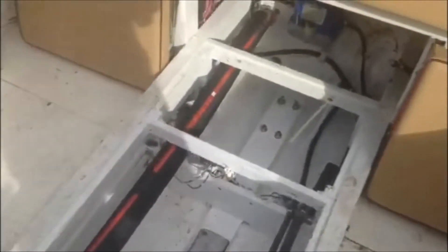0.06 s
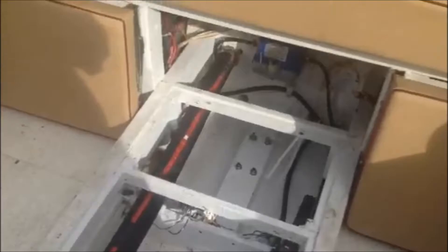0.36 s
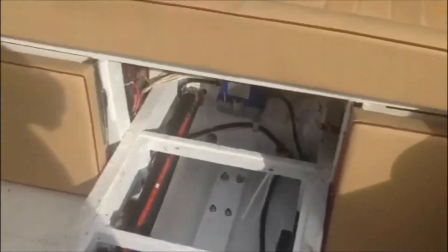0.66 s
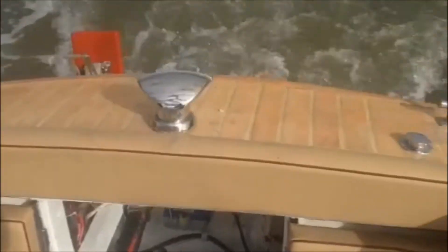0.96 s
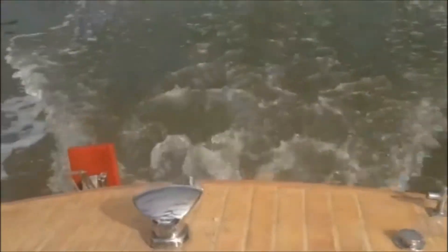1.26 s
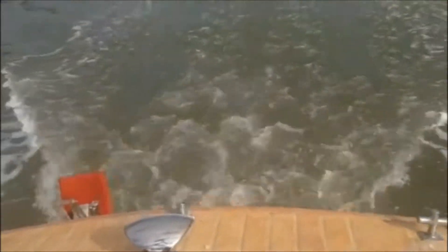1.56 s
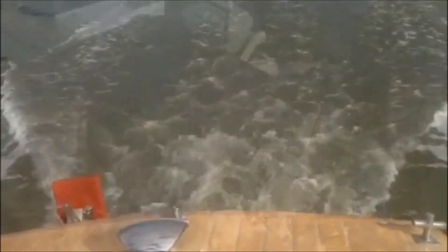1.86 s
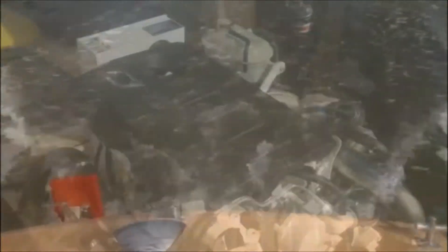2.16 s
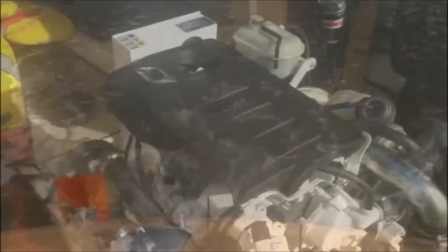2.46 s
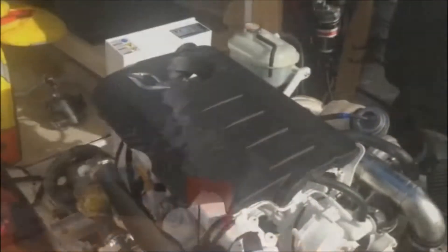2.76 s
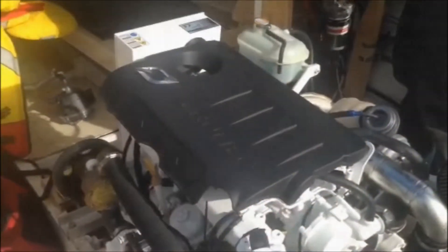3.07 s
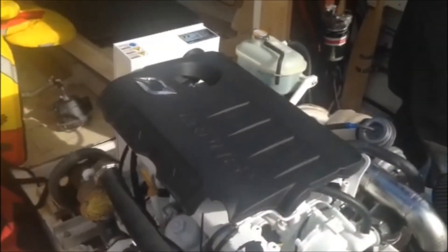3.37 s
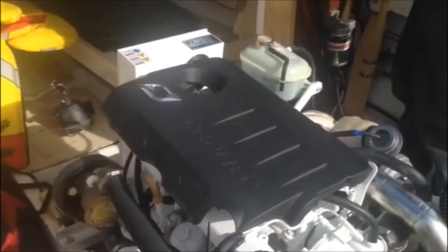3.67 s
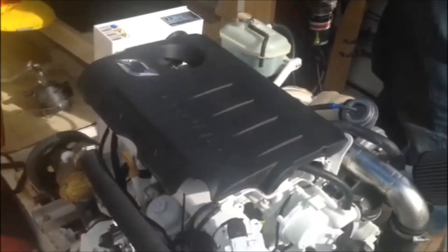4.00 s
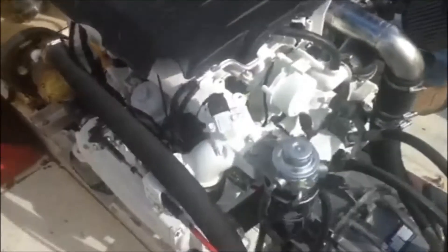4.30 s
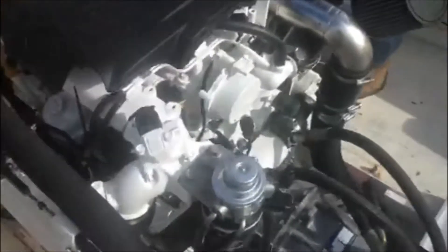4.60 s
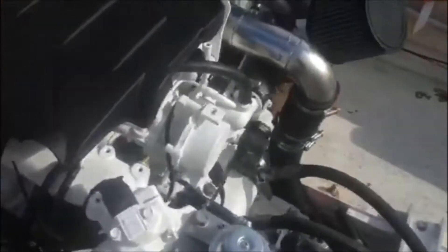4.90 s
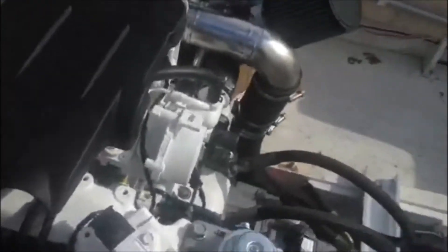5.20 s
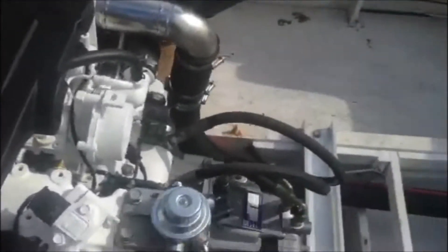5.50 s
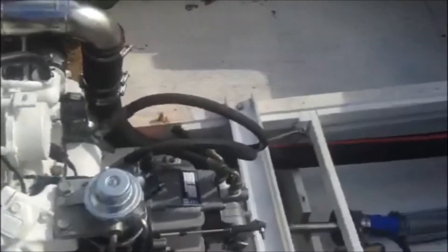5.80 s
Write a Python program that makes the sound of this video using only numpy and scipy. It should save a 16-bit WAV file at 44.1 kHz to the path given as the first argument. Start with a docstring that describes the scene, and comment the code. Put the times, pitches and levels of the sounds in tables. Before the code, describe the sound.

Heard from the back of a boat, a diesel engine thumps and clatters at a loping idle. Suddenly the microphone is right over the engine, louder, as it accelerates: the block knocks, the exhaust booms briefly, and the turbo's airy rush rises until only a bright hiss is left. Water rumbles against the hull underneath. At cruising speed the engine holds a clattering hum, topped by a fluttering whine.

```python
"""Four-cylinder boat diesel. At idle, from the stern: one cylinder thumps, injectors clatter, a gear sings.
Then, abruptly, from above the open engine bay, pulling up to cruise: combustion knocks in the block,
valves clatter, the wet exhaust booms, the turbo's rush climbs out of hearing, churned water rumbles.
Firing and propeller settle into a hum under a rough whine. Engine speed, effort and turbo speed drive
the layers; resonances swell as the rising pitches pass through them."""
import sys
import numpy as np
from scipy import signal
from scipy.fft import rfft, irfft, next_fast_len
from scipy.io import wavfile
from scipy.ndimage import uniform_filter1d, map_coordinates

SR = 44100
rng = np.random.default_rng(int(sys.argv[2]) if len(sys.argv) > 2 else 0)


def store_wav(level_fs):
    """Save 16-bit WAV to argv[1]."""
    pcm = np.round(np.clip(np.atleast_2d(level_fs), -1, 1) * 32767)
    wavfile.write(sys.argv[1], SR, pcm.T.astype(np.int16))


N = 266805
TIME_S = np.arange(N) / SR

# hull modes struck at idle (frequency [Hz], time constant [s], strength for cylinder 1, 2, 3, 4 [dB])
HULL_MODES = [(87.7, 0.01, -30, -28, -33, -29), (167, 0.0043, -24, -30, -45, -40),
              (218, 0.0029, -24, -33, -22, -21), (325, 0.0047, -29, -29, -22, -47)]
# engine speed under load (time [s], firing rate [Hz])
FIRING_HZ = [(1.75, 40), (2.08, 45.8), (2.55, 51), (2.9, 58.8), (3.7, 71.2), (3.97, 78.3), (4.22, 87.3),
             (4.48, 91.5), (4.8, 92.6), (5.1, 95), (6.05, 98.5)]
# engine effort (time [s], level [dB])
EFFORT_DB = [(1.75, -21.5), (2.08, -17.3), (2.2, -18.5), (2.58, -16), (2.68, -17), (2.94, -14.5),
             (3.1, -17), (3.33, -14.8), (3.72, -18.5), (4.08, -21), (4.5, -18.5), (5.2, -19.3),
             (5.42, -17.3), (5.56, -19), (6.05, -18)]
# turbo spool-up (time [s], rush centre [Hz])
TURBO_HZ = [(1.75, 3970), (2.2, 5050), (2.6, 5600), (2.9, 8370), (3.72, 13180), (4.1, 15050), (4.4, 18800)]
# churned water (time [s], level [dB])
WATER_DB = [(1.75, -31), (1.95, -22.5), (2.1, -32.5), (2.6, -21), (3.15, -26), (3.3, -45), (3.75, -46),
            (3.9, -34), (4.47, -21), (4.85, -30), (5.4, -26.5), (6.05, -30)]
# shaft lines at cruise (order [x firing rate], relative level [dB])
SHAFT_ORDERS = [(2, -15), (2.5, -13), (2.75, -11), (3.25, -15), (3.75, -22), (4, -23), (6, -26), (7, -26),
                (11, -23), (23.5, -20)]
# whine spells (start [s], length [s], first pitch [Hz], target pitch [Hz], level [dB])
WHINE_SPELLS = [(4.19, .18, 2980, 3150, -29), (4.77, 1.0, 3165, 3276, -26), (5.87, .3, 3180, 3175, -25.5)]

# spectra (frequency [Hz], relative density [dB]); TOP: above the cover, FRONT: by the belt drive
IDLE_SPECTRUM = [(20, -22), (45, -4), (75, 0), (250, 3.5), (370, 5), (480, -2), (650, -0.5), (1400, -1),
                 (2100, -6), (2900, -6.5), (4600, -7), (6800, -11), (9000, -17), (15000, -25.5)]
BLOCK_TOP_SPECTRUM = [(270, -9), (450, -6), (520, -5.5), (620, -0.5), (700, -3.5), (790, -3), (880, -5),
                      (1200, -2), (1420, -2), (1750, -2), (2100, -7.5), (2260, -2), (2650, -8), (3100, -23),
                      (4500, -70)]
BLOCK_FRONT_SPECTRUM = [(270, -48), (450, -3), (570, 1.1), (690, 0), (760, -1.5), (900, -2.5), (1050, -2),
                        (1250, -1), (1630, -4.5), (1850, 2), (2050, -3.5), (2300, 0), (2700, -0.8),
                        (3100, -14), (4500, -70)]
VALVE_TOP_SPECTRUM = [(1800, -52), (2700, -7.5), (3200, -4), (3800, 1.5), (4600, 0), (5600, -0.5),
                      (6200, -21), (8000, -18)]
VALVE_FRONT_SPECTRUM = [(1800, -24), (2700, -7), (3100, -2.5), (3700, 0), (4600, -1.5), (5600, -1.5),
                        (6200, -5.5), (8000, -22)]
BOOM_LOW_REV_SPECTRUM = [(100, -49), (165, -8.5), (215, -8), (270, -1.5), (322, 4.5), (370, -8.5),
                         (430, -4), (480, -16), (600, -9), (1000, -72)]
BOOM_HIGH_REV_SPECTRUM = [(100, -54), (170, -9), (220, -1.5), (260, -4), (315, 2.5), (370, -7.5),
                          (440, -10.5), (540, -35), (1000, -70)]
HISS_TOP_SPECTRUM = [(3650, -31), (6200, -4.5), (6890, -3), (7430, -4), (8710, -2.5), (9540, -5.5),
                     (10200, -2.5), (11300, -2.5), (13400, 0), (15300, -3.5)]
HISS_FRONT_SPECTRUM = [(3650, -41), (6200, -5), (6970, 1), (8140, -1), (9260, -5.5), (10900, -3.5),
                       (11700, 2.5), (12300, -2.5), (14700, 1.5), (15300, -2.5)]
WATER_SPECTRUM = [(15, -27), (35, -24), (60, -4.5), (110, -4), (160, 1), (200, -3.5), (260, -6.5),
                  (500, -75)]
DECK_SPECTRUM = [(10, -12), (30, -10), (55, 6), (90, -20), (200, -60)]
# turbo rush sidebands (offset from centre [Hz], relative density [dB])
RUSH_NARROW = [(1, -11), (200, 7), (550, -5), (1500, -33), (4000, -70)]
RUSH_WIDE = [(1, 0), (600, -8), (1300, -11), (2500, -11), (5000, -70)]

# ringing panels at idle, castings and pipes in the bay (centre [Hz], width [Hz], lift [dB])
PANEL_PEAKS = [(802, 76, 8), (840, 30, -7.5), (1460, 52, 4), (1880, 68, 3), (2257, 79, 6.5), (2430, 110, 9),
               (3140, 70, 3.5), (3735, 210, 7), (5450, 220, 2.5)]
BAY_PEAKS = [(795, 34, 5.5), (1196, 28, 4.5), (1405, 83, 5.5), (2267, 25, 6.5), (2794, 68, 6.5),
             (2992, 97, 7), (3160, 81, 9), (3360, 41, 7), (3725, 51, 5.5), (3940, 51, 3.5), (4300, 86, 6),
             (4670, 120, 7.5), (5090, 51, 7), (5740, 135, 6.5), (6830, 250, 3), (7990, 320, 3),
             (10060, 200, 3.5), (13450, 250, 1)]
# resonances crossed by rising pitches (centre [Hz], width [Hz], peak gain [dB])
FIRING_PEAKS = [(88.06, 5.4, -18), (98, 6.6, -20.5)]
PROPELLER_PEAKS = [(151.7, 16.3, -25)]
INTAKE_PEAKS = [(4770, 500, -18.5), (5620, 120, -14), (10000, 3500, -38), (13300, 2100, -15)]
DRONE_PEAKS = [(417, 14, -34), (458, 20, -39)]
# exhaust pipe ringing (firing rate [Hz], width [Hz], level re boom [dB])
PIPE_PEAKS = [(45.7, 1.2, 0), (51, 2, -7)]

IDLE_FIRING_HZ, FIRST_FIRING_S = 30.44, .025
BLADES_PER_FIRING, TEETH_PER_FIRING = 1.594, 42
BAY_START_S, APPROACH_START_S = 1.744, 4.1
FULL_BOOST_HZ, BAND_LIMIT_HZ = 13770, 15330


def cylinder_thumps(lope_db=-15.5, lope_lead_s=.0057):
    """Idle firings strike the hull modes; the fourth cylinder hits hardest, so the idle lopes."""
    t, out = TIME_S[:SR // 8], np.zeros(N + SR)
    mode = lambda hz, tau_s: (t / tau_s) ** 2 * np.exp(-t / tau_s) * np.sin(2 * np.pi * hz * t)
    firing_s = FIRST_FIRING_S + np.arange(round(2 * IDLE_FIRING_HZ)) / IDLE_FIRING_HZ
    for hz, tau_s, *cylinder_db in HULL_MODES:
        for k, (jitter, force) in enumerate(rng.standard_normal((len(firing_s), 2))):
            at = max(round((firing_s[k] - .007 + .00082 * jitter) * SR), 0)
            out[at:at + len(t)] += amp(cylinder_db[k % 4] + 3.3 * force) * mode(hz, tau_s)
    for strong_s in firing_s[3::4]:
        detune, force = rng.standard_normal(2)
        thump = mode(172 + 5 * detune, .0062) + amp(-7.5 + 3 * force) * mode(218, .0048)
        at = round((strong_s - lope_lead_s) * SR)
        out[at:at + len(t)] += amp(lope_db) * thump
    return out[:N]


def idle_clatter(firings, crossover_hz=2400, fade_db_per_s=3):
    """Knock below, injector ticks above ring the panels; fades as the listener leans over the stern."""
    knock = rattle(firings, repeat=.48, pulse_db=2.7, scatter_db=1.5)
    ticks = rattle(firings, repeat=.35, pulse_db=1.5, scatter_db=1.1)
    low_share = lambda hz: 1 / (1 + (hz / crossover_hz) ** 4)
    lows = filtered(knock, lambda hz: np.sqrt(low_share(hz)))
    highs = filtered(ticks, lambda hz: np.sqrt(1 - low_share(hz)))
    return amp(-23 - fade_db_per_s * TIME_S) * coloured(lows + highs, IDLE_SPECTRUM, PANEL_PEAKS)


def hull_hum(firings):
    """Firing pulses, shaft orders and propeller blades drive the hull at its resonances."""
    firing_hz = curve(FIRING_HZ)
    tone = lambda order, drift_rad: sine(order * firings, drift_rad * wobble(6.2))
    shaft = sum(amp(db + 1.564 * wobble(6.1)) * tone(order, .4) for order, db in SHAFT_ORDERS)
    cruise = ramp(TIME_S, 4.3, 5.34)
    engine = tone(.99, .061) * amp(.9 * wobble(13)) + amp(2) * cruise * shaft
    blades = tone(BLADES_PER_FIRING, .12) + amp(-26) * cruise * tone(2 * BLADES_PER_FIRING, .29)
    blade_gain = swept(BLADES_PER_FIRING * firing_hz, PROPELLER_PEAKS) * amp(wobble(6))
    return swept(firing_hz, FIRING_PEAKS) * engine + blade_gain * blades


def block_knock(firings, boost_cut_db=6, approach_db_per_s=2.5):
    """Combustion knocks in the block; boost softens it."""
    top, front = (coloured(rattle(firings, repeat=.33, pulse_db=.5, scatter_db=1.96), shape, BAY_PEAKS)
                  for shape in (BLOCK_TOP_SPECTRUM, BLOCK_FRONT_SPECTRUM))
    level_db = curve(EFFORT_DB) - .72 - boost_cut_db * boost() + approach_db_per_s * approach_s()
    return amp(level_db) * blend(top, front, ramp(TIME_S, 3.7, 4.16))


def valve_clatter(firings):
    """Valve gear rings the castings; the colour shifts from cover to front."""
    impacts = lambda pulse_db: rattle(firings, repeat=.25, pulse_db=pulse_db, scatter_db=1.06)
    top = coloured(impacts(1.56), VALVE_TOP_SPECTRUM, BAY_PEAKS)
    front = coloured(impacts(1.5), VALVE_FRONT_SPECTRUM, BAY_PEAKS)
    level_db = curve(EFFORT_DB) - .5 + .85 * wobble(21.61)
    return amp(level_db) * blend(top, front, ramp(TIME_S, 3.7, 4.16))


def exhaust_boom(firings, clear_drop_db=12.5, approach_db_per_s=4.5):
    """The wet exhaust booms and rings its pipe until the gas blows it clear."""
    firing_hz = curve(FIRING_HZ)
    cleared = ramp(firing_hz, 53, 60.2)
    level_db = curve(EFFORT_DB) - 3 - clear_drop_db * cleared + approach_db_per_s * approach_s()
    low_rev, high_rev = (coloured(rattle(firings, repeat=.47, pulse_db=4, scatter_db=2.5), shape)
                         for shape in (BOOM_LOW_REV_SPECTRUM, BOOM_HIGH_REV_SPECTRUM))
    boom = blend(low_rev, high_rev, ramp(TIME_S, 2.25, 2.74))
    return amp(level_db) * (1 + swept(firing_hz, PIPE_PEAKS)) * boom


def turbo_hiss(firings, boost_lift_db=10.5):
    """Air hisses up to an edge that climbs with turbo speed."""
    front_share = ramp(TIME_S, 4.77, 5.2)
    gulp_db = 1.4 + 1.9 * ramp(curve(FIRING_HZ), 75.6, 78)  # harder gulps at high revs
    top, front = (coloured(rattle(firings, repeat=.24, pulse_db=gulp_db, scatter_db=1), shape, BAY_PEAKS)
                  for shape in (HISS_TOP_SPECTRUM, HISS_FRONT_SPECTRUM))
    hz, frame_s, bins = signal.stft(blend(top, front, front_share), SR, nperseg=512)
    edge_hz = np.interp(frame_s, TIME_S, curve(TURBO_HZ))
    above_oct = np.maximum(np.log2((hz[:, None] + 1) / edge_hz), 0)
    hiss = signal.istft(bins * amp(-27 * np.tanh(.58 * above_oct)), SR, nperseg=512)[1][:N]
    hiss /= np.sqrt(np.abs(uniform_filter1d(hiss ** 2, size=6000)) + 1e-12)  # running rms 1
    level_db = curve(EFFORT_DB) - 6 + boost_lift_db * boost() - 2 * front_share
    return amp(level_db + .83 * wobble(25)) * hiss


def turbo_rush(firings):
    """Intake air rushes in a band at the turbo's pitch, wider as the flow quickens."""
    centre_hz = curve(TURBO_HZ)
    narrow = coloured(rng.standard_normal(N), RUSH_NARROW)
    wide = coloured(rng.standard_normal(N), RUSH_WIDE)
    rush = blend(narrow, wide, ramp(TIME_S, 2.4, 3.1)) * sine(np.cumsum(centre_hz) / SR)
    gulp_db = np.interp(TIME_S, [2.15, 2.6], [3.5, 1.2]) * np.cos(2 * np.pi * firings)
    return swept(centre_hz, INTAKE_PEAKS) * amp(gulp_db) * rush


def water_rumble(firings):
    """Churned water rumbles on the hull; at speed the deck shakes deeper."""
    rumble = coloured(rattle(firings, repeat=.035, pulse_db=-3.5, scatter_db=2), WATER_SPECTRUM)
    shudder = coloured(rng.standard_normal(N), DECK_SPECTRUM)
    return amp(curve(WATER_DB)) * (rumble + amp(-13) * ramp(TIME_S, 3.8, 4.2) * shudder)


def front_whine(fade_s=.09, settle_s=.5):
    """A rough, fluttering whine from the engine's front comes and goes at cruise."""
    whine = np.zeros(N)
    for start_s, length_s, first_hz, target_hz, db in WHINE_SPELLS:
        t = np.maximum(TIME_S - start_s, 0)
        hz = target_hz + (first_hz - target_hz) * np.exp(-t / settle_s)
        envelope = ramp(np.minimum(t, length_s - t), 0, fade_s)
        whine += amp(db) * envelope * sine(np.cumsum(hz) / SR, .6 * wobble(40) + .45 * wobble(260))
    return amp(1.18 * wobble(30) + 1.7 * wobble(140)) * whine


def drone(firings, order=6, flutter_db=3.5):
    """A firing harmonic drones briefly as it crosses resonances."""
    gain = swept(order * curve(FIRING_HZ), DRONE_PEAKS) * amp(flutter_db * wobble(35))
    return gain * sine(order * firings, .45 * wobble(25))


def gear_tone(firings, fade_db_per_s=2):
    """Meshing teeth sing at idle, slowly fading."""
    tone = sine(TEETH_PER_FIRING * firings, .5 * wobble(9))
    return amp(-37 - fade_db_per_s * TIME_S + 1.5 * wobble(14)) * tone


def rattle(firings, repeat, pulse_db, scatter_db, knots=2048):
    """Dense impacts pulsing at the firing rate; the share `repeat` recurs every four firings."""
    cycle = (firings + .002 * wobble(25)) / 4 % 1
    recurring = unit(map_coordinates(rng.standard_normal(knots), [cycle * knots], mode="grid-wrap"))
    impacts = blend(rng.standard_normal(N), recurring, repeat)
    # about six ticks a firing
    ticks = map_coordinates(rng.standard_normal(knots * 2), [firings * 6], mode="grid-wrap")
    return unit(impacts * amp(pulse_db * np.cos(2 * np.pi * firings) + scatter_db * ticks))


def boost():
    """Boost, 0 to 1, by octaves of turbo climb."""
    log_hz = np.log(curve(TURBO_HZ))
    return ramp(log_hz, log_hz[0], np.log(FULL_BOOST_HZ))


def approach_s():
    """Time the listener has moved toward the block."""
    return np.maximum(TIME_S - APPROACH_START_S, 0)


def swept(hz, peaks):
    """Gain of a pitch moving through resonances."""
    half_power_db = 10 * np.log10(2)
    return np.sqrt(sum(amp(db - half_power_db * (2 * (hz - centre_hz) / width_hz) ** 2) ** 2
                       for centre_hz, width_hz, db in peaks))


def coloured(x, spectrum, peaks=()):
    """x through a broad spectrum and narrow resonances, at rms 1."""
    knot_hz, knot_db = np.transpose(spectrum)

    def response(hz):
        broad_db = np.interp(np.log(hz + 1), np.log(knot_hz + 1), knot_db)
        lift_db = sum(db / (1 + (2 * (hz - centre) / width) ** 2) for centre, width, db in peaks)
        return amp(broad_db + lift_db)
    return unit(filtered(x, response))


def filtered(x, response):
    """x through a frequency response."""
    size = next_fast_len(N + 8192)
    return irfft(rfft(x, size) * response(np.fft.rfftfreq(size, 1 / SR)), size)[..., :N]


def blend(a, b, share):
    """Equal-power mix; b gets `share`."""
    return np.sqrt(1 - share) * a + np.sqrt(share) * b


def wobble(rate_hz):
    """Smooth random curve."""
    return map_coordinates(rng.standard_normal(int(N * rate_hz / SR) + 4), [TIME_S * rate_hz])


def sine(cycles, phase_rad=0):
    """Sine at rms 1."""
    return np.sqrt(2) * np.sin(2 * np.pi * cycles + phase_rad)


def curve(points):
    return np.interp(TIME_S, *np.transpose(points))


def ramp(x, start, end):
    return np.clip((x - start) / (end - start), 0, 1)


def amp(db):
    return 10 ** (np.asarray(db) / 20)


def unit(x):
    return x / np.sqrt(np.mean(x ** 2) + 1e-20)


def scene():
    """Idle at the stern, then the pull under load at the bay; both channels alike."""
    firings = np.cumsum(curve(FIRING_HZ)) / SR
    loaded = hull_hum(firings) + water_rumble(firings) + exhaust_boom(firings)
    loaded += block_knock(firings) + valve_clatter(firings)
    loaded += turbo_hiss(firings) + turbo_rush(firings) + front_whine() + drone(firings)
    idle_firings = (TIME_S - FIRST_FIRING_S) * IDLE_FIRING_HZ
    idle = idle_clatter(idle_firings) + gear_tone(idle_firings) + cylinder_thumps()
    mono = blend(idle, loaded, ramp(TIME_S, BAY_START_S, BAY_START_S + .0021))
    return np.array([mono, mono])


def record(dry):
    """Soft peak limiting, then a brick-wall low-pass."""
    rounded = dry / (1 + np.abs(dry) ** 8) ** (1 / 8)
    return filtered(rounded, lambda hz: hz < BAND_LIMIT_HZ)


dry = scene()
out = record(dry)
store_wav(out)
```